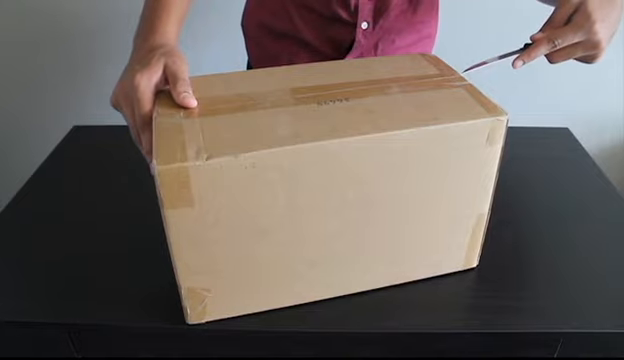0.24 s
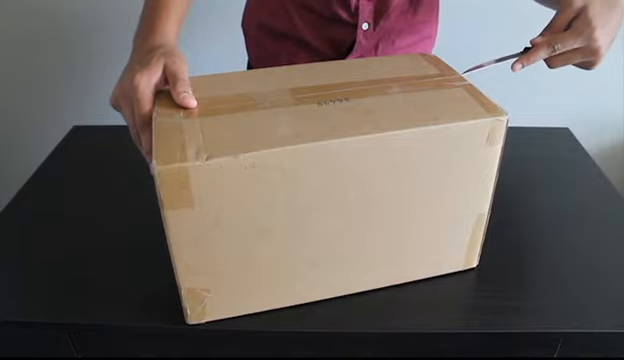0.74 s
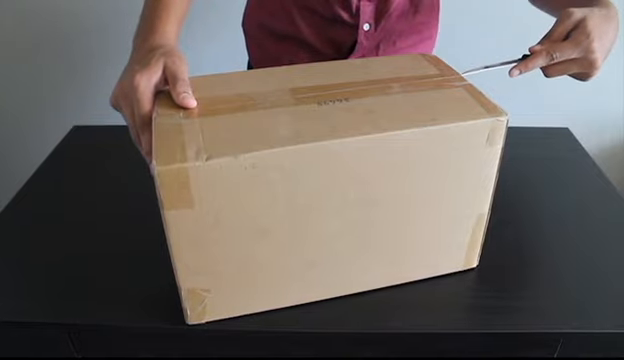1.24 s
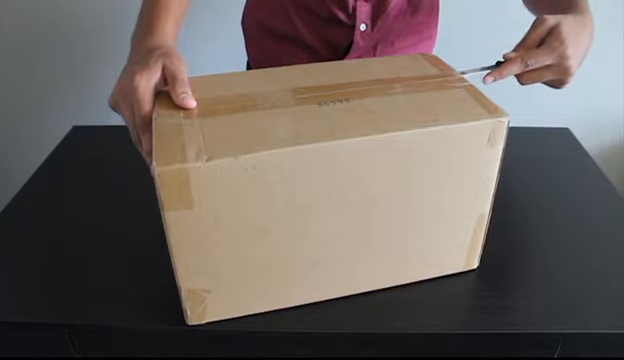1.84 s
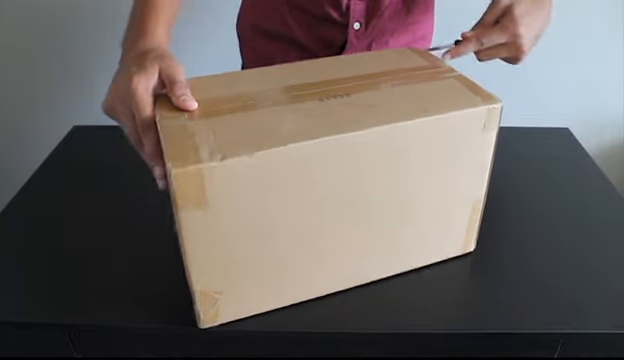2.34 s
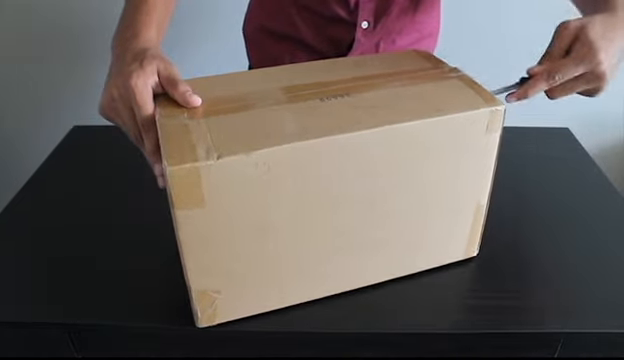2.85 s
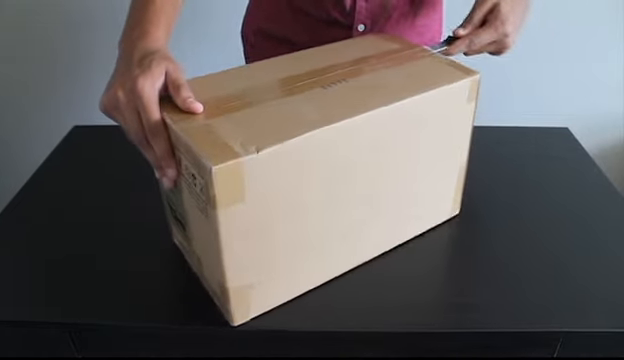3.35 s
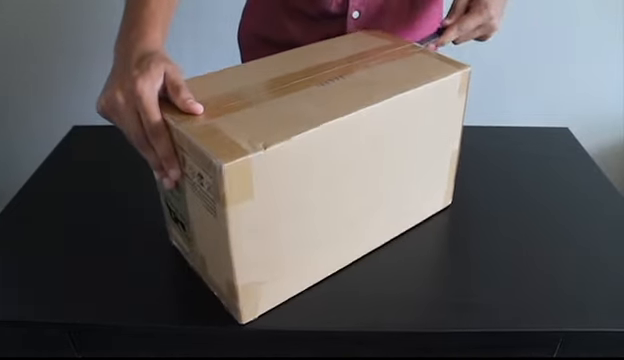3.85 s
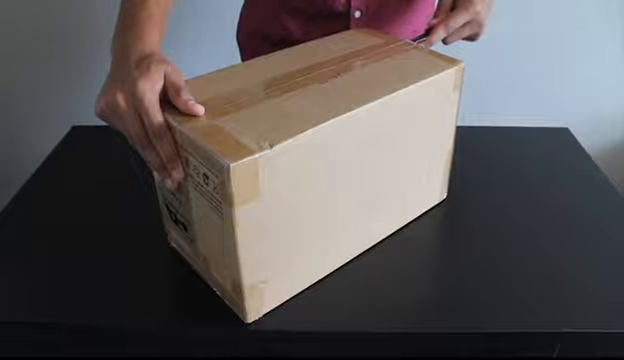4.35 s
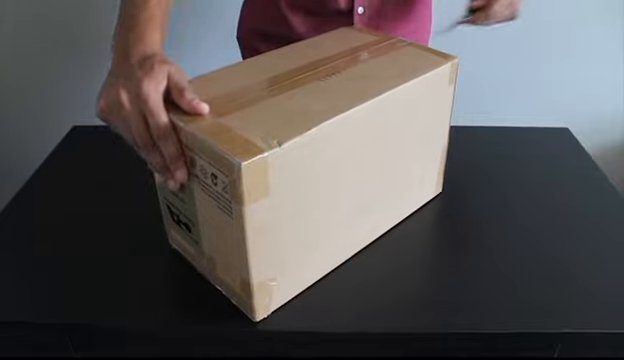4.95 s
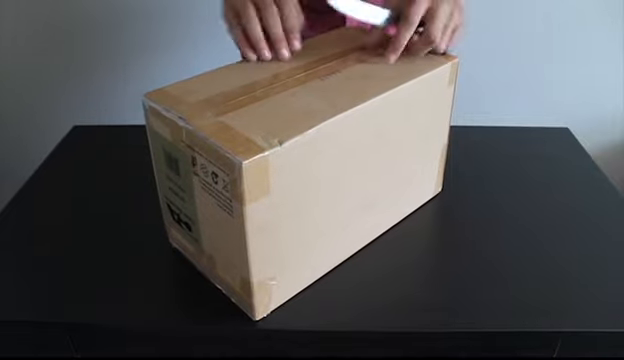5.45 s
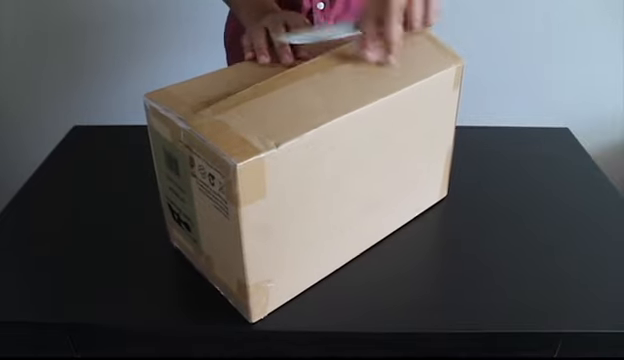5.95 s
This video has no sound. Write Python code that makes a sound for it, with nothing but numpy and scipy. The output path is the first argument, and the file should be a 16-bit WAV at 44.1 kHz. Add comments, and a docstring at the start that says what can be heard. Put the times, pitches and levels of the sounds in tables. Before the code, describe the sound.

Brief papery scrapes and crisp tape snaps on a cardboard box, followed by loud double knife knocks and soft thumps, close up indoors.

```python
"""A low room hum, faint hiss and a thin wandering whine open the scene; then a knife saws through packing
tape on a cardboard box that stands on a table in a quiet, bare room.
Slips of the blade and knocks ring the box walls, torn fibres crackle in the tape, the table thumps.
Clicks excite decaying modes, sparse echoes make the room, coloured noise makes hum and hiss."""
import sys
import numpy as np
from scipy import signal
from scipy.fft import rfft, irfft
from scipy.io import wavfile
from scipy.ndimage import uniform_filter1d

SR = 44100
rng = np.random.default_rng(int(sys.argv[2]) if len(sys.argv) > 2 else 0)


def file_out(sig):
    """Save sig as 16-bit WAV at sys.argv[1]."""
    # one column per channel
    cols = np.atleast_2d(sig).T
    # limit, then scale
    lim = np.clip(cols, -1, 1)
    pcm = np.round(lim * 32767).astype(np.int16)
    wavfile.write(sys.argv[1], SR, pcm)


def volts_from_decibels(level):
    """Turn decibel levels (scalar or array-like) into linear amplitude factors."""
    exponent = np.asarray(level, float) / 20
    return 10 ** exponent


N = 273420  # length in samples

# Strokes of blade or hand, rubbing levels at the height of the stroke:
# start_s, length_s, low_walls_db, upper_walls_db, flap_db, tape_db
STROKES = [(0.576, 0.18, -44, -44, -46, -43), (0.845, 0.22, -51, -57, -63, -67),
           (0.983, 0.25, -54.5, -51, -53.5, -54.5), (1.468, 0.13, -38, -41, -49, -46.5),
           (1.585, 0.087, -34.5, -35, -41, -41.5), (1.648, 0.075, -41, -46, -47, -36),
           (1.667, 0.13, -46, -46, -47.5, -53), (1.904, 0.16, -41.5, -42.5, -46, -44.5),
           (2.595, 0.23, -52.5, -56, -51.5, -63), (3.204, 0.21, -44.5, -50.5, -51, -63),
           (3.425, 0.16, -46, -50.5, -46, -51), (3.804, 0.15, -50, -42.5, -52, -56),
           (4.779, 0.19, -54, -53, -55, -62), (5.62, 0.21, -60, -53, -65, -75),
           (6.099, 0.13, -55, -52.5, -51, -64)]
# The blade catches and tape fibres snap; the rows near 2.0 s and 6.0 s are dull thuds that set the flap going.
# Peak levels: # start_s, tape_crack_db, low_walls_db, upper_walls_db, flap_db
SNAPS = [(0.2742, -26.5, -63, -58, -60), (0.5674, -14, -26, -25.5, -26.5), (0.5687, -19, -40, -30, -35),
         (0.5906, -19, -38, -36, -28), (0.6305, -39, -49, -42, -39), (0.672, -25.5, -56, -32, -41),
         (1.595, -43, -35, -31, -42), (1.6099, -37, -29.5, -31, -35), (1.9992, -32, -17.5, -18, -28.5),
         (2.0405, -26, -50, -52, -50), (2.0601, -50, -42, -34, -54), (3.4034, -51, -45, -43, -41),
         (3.921, -30, -64, -60, -54), (4.0739, -28.5, -60, -60, -38), (4.8135, -50, -50, -37, -37),
         (4.8213, -33.5, -53, -42, -42), (5.219, -31, -55, -52, -42), (5.7595, -37, -57, -61, -59),
         (5.8928, -34, -45, -37.5, -34.5), (6.0016, -29, -18.5, -21.5, -25.5),
         (6.1056, -50, -43, -31.5, -28)]
# The knife strikes the box, peak levels:
# start_s, blade_clack_db, table_thump_db, low_walls_db, upper_walls_db, handle_db
KNOCKS = [(4.873, -44, -46, -51, -51, -42), (4.888, -44, -46, -52, -48, -44),
          (4.8976, -36, -42, -56, -38, -37), (4.9227, -30.5, -31, -34.5, -25, -23),
          (4.944, -46, -41, -48, -47, -38), (4.9854, -43, -46, -40, -41, -40),
          (5.242, -11.5, -18.5, -27, -7, -8), (5.2650, -3, -15, -11.5, -10.5, -3),
          (5.326, -16, -41, -47, -22.5, -16), (5.3896, -30, -36, -41, -36, -35)]
# Soft pushes on the box, peak levels: start_s, table_thump_db, low_walls_db, upper_walls_db
THUDS = [(0.63, -38, -49, -48), (0.668, -34, -47, -45), (1.594, -37, -45, -53), (4.478, -43.5, -50, -48),
         (4.779, -40, -38.5, -49), (5.307, -26.5, -25, -20.5), (5.4775, -21.5, -42, -42),
         (5.491, -32, -28, -35), (5.54, -38, -36, -55), (5.6083, -42, -37, -34.5), (6.062, -49, -34, -34)]

# Modes of each body, levels relative within the body: pitch_hz, level_db, t60_s
TAPE = [(2635, 2.5, 0.0042), (3420, 2, 0.0039), (4630, 6, 0.0018), (6430, 7, 0.0012), (8830, 6, 0.0015),
        (10630, 5.5, 0.0017), (13000, 5.5, 0.00099), (15100, -1, 0.001)]
FLAP = [(1060, 2, 0.016), (1454, -1, 0.017), (1803, 3, 0.0084), (2270, -2, 0.0095)]
UPPER_WALLS = [(438.5, -1, 0.047), (508, 3.5, 0.039), (608, 8, 0.025), (752, -4.5, 0.038),
               (925, -2.5, 0.028)]
LOW_WALLS = [(252.4, -2, 0.039), (262.2, 14, 0.031), (415, -7, 0.041)]
TABLE = [(43.3, 9, 0.12), (64.4, -8, 0.077), (99.4, 1, 0.082), (167.5, 3.5, 0.05)]
KNIFE = [(2530, 0.5, 0.0057), (3370, -2.5, 0.0029), (4290, -1, 0.0063), (5500, -6.5, 0.0046),
         (6470, -6, 0.0068), (8200, -0.5, 0.0025), (10700, -5.5, 0.0024), (13100, -1.5, 0.0013),
         (15900, -26, 0.0018)]
HANDLE = [(1180, -3, 0.017), (1572, 7.5, 0.019), (1781, -7, 0.048), (1950, -3, 0.017)]

# Shudder of the loose box, level under the blow, one row:
# low_walls_db, upper_walls_db, flap_db, tape_db
SHUDDER_DB = (-19, -22, -25, -30)
# Decay of the room by band: frequency_hz, t60_s
ROOM = [(150, 0.13), (500, 0.26), (1500, 0.17), (4000, 0.1), (12000, 0.24)]
# Colour of the room hum: frequency_hz, relative_level_db
HUM = [(2, -4), (4, 10), (16, 1.5), (32, -11), (125, -12.5), (162, -10), (205, -15.5), (382, -19),
       (465, -14.5), (560, -20.5), (800, -20.5), (1340, -22), (3070, -26.5), (15500, -27.5)]
# Colour of the hiss opposed between the channels: frequency_hz, relative_level_db (per Hz)
HISS = [(2, 6), (16, -2), (320, -14.5), (760, -16.5), (2200, -18), (13400, -18), (16500, -20.5)]
# Path of the whine before its tremble: time_s, pitch_hz
WHINE = [(0.0, 1200), (0.24, 1000), (0.4, 1265), (0.62, 1190), (0.899, 1276), (1.219, 1040), (1.43, 1196),
         (1.58, 1080), (1.8, 1230), (2.25, 1340), (2.6, 1190), (3.05, 1200), (3.5, 1300), (4.001, 1252),
         (4.3, 1106), (4.87, 1304), (5.1, 1180), (5.4, 1290), (5.7, 1190), (6.08, 1320), (6.2, 1230)]

SLIPS_PER_S, TEARS_PER_S = 2000, 1800
PEAK_AT = 0.37  # where in a stroke the pressure peaks (0-1)
STROKE_ENDS_DB, STROKE_ROUNDNESS = -22, 1.6  # level at both ends under the peak, shape of the arch
SHUDDER_AFTER_S, SHUDDER_FADE_DB_PER_S = 0.01, 142
SNAP_THUMP_DB = -14  # the table follows the low walls
ROOM_DB = -10.5
HUM_DB, HISS_DB, NOISE_EDGE_HZ = -46.5, -57, 15820
WHINE_LEFT_DB, WHINE_RIGHT_UNDER_LEFT_DB = -60.5, -28
WHINE_TREMBLE_HZ = 34.54  # rms


def evened(x):
    """Scales a signal to an rms of 1."""
    return x / np.sqrt(np.mean(x ** 2) + 1e-20)


def add(mix, start_s, sound):
    """Mixes a sound in at a time, cut where the mix ends."""
    part = mix[max(round(start_s * SR), 0):][:len(sound)]
    part += sound[:len(part)]


def clicks(per_s, spread_db, size):
    """Random clicks of either sign, a few of them large, at an rms of 1."""
    chance, side = rng.random((2, size))
    height = volts_from_decibels(spread_db * np.minimum(rng.exponential(1, size), 4))
    return evened((chance < per_s / SR) * height * np.sign(side - 0.5))


def ring(modes, detune=1):
    """Answer of a body to one click, energy 1: decaying modes that swell over their first cycle."""
    t = np.arange(SR // 4) / SR
    hz, db, t60 = np.transpose(modes)[..., None]
    sense = (-1) ** np.arange(len(modes))[:, None]  # neighbours move in opposite senses
    swell = 1 - np.exp(-(2.13 * hz * t) ** 2)
    decay = volts_from_decibels(db - 60 * t / t60)
    rings = (sense * swell * decay * np.sin(2 * np.pi * hz * detune * t)).sum(0)
    return rings / np.linalg.norm(rings)


def pressure():
    """Rubbing level of low walls, upper walls, flap and tape: an arch per stroke, a shudder per snap or knock."""
    t = np.arange(N) / SR
    power = np.zeros((4, N))
    for start, length, *part_db in STROKES:
        inside = (t >= start) & (t < start + length)
        u = (t[inside] - start) / length
        off_peak = np.where(u < PEAK_AT, 1 - u / PEAK_AT, (u - PEAK_AT) / (1 - PEAK_AT))
        arch_db = STROKE_ENDS_DB * off_peak ** STROKE_ROUNDNESS
        power[:, inside] += volts_from_decibels(np.add.outer(part_db, arch_db)) ** 2

    # the loose box shudders on; after a knock, handle and blade levels set flap and tape
    shaken = [(s, low, up, flap, tape) for s, tape, low, up, flap in SNAPS]
    shaken += [(s, low, up, handle, blade) for s, blade, _, low, up, handle in KNOCKS]
    fade_db = -SHUDDER_FADE_DB_PER_S * np.arange(SR // 2) / SR
    for s, *part_db in shaken:
        shudder = volts_from_decibels(np.add.outer(np.add(part_db, SHUDDER_DB), fade_db))
        add(power.T, s + SHUDDER_AFTER_S, shudder.T ** 2)
    return np.sqrt(power)


def strokes():
    """Stick-slip of the blade shakes walls and flap; tape fibres tear in dense fine clicks."""
    # pressure comes in lumps, 2.04 dB rms
    judder = volts_from_decibels(2.04 * evened(uniform_filter1d(rng.standard_normal(N), 300)))
    slips = judder * clicks(SLIPS_PER_S, 1.3, N)
    tears = judder * clicks(TEARS_PER_S, 1.84, N)
    dull_tears = signal.lfilter([1], [1, -0.45], tears)  # a slow tear is darker than a snap
    drives = (slips, slips, 0.77 * slips + 0.65 * tears, dull_tears)
    bodies = (LOW_WALLS, UPPER_WALLS, FLAP, TAPE)
    out = np.zeros(N)
    for level, drive, modes in zip(pressure(), drives, bodies):
        out += signal.oaconvolve(level * evened(drive), ring(modes))[:N]
    return out


def blows(events, bodies, contact_s, chatter_db):
    """Each blow is a first click and a short chatter that ring the bodies it reaches."""
    out = np.zeros(N)
    size = SR // 50
    t = np.arange(size) / SR
    for s, *part_db in events:
        chatter = volts_from_decibels(chatter_db) * clicks(6000, 3.0, size) * np.exp(-(t / contact_s) ** 2)
        spot = 1 + 0.015 * rng.standard_normal((9, 1))  # each spot struck shifts the modes a little
        for db, modes in zip(part_db, bodies):
            felt = min(modes[0][0] / 2400, 1)  # heavy, low parts hardly feel the chatter
            strike = felt * chatter + (t == 0)
            sound = signal.fftconvolve(strike, ring(modes, spot[:len(modes)]))
            add(out, s, volts_from_decibels(db) * sound / abs(sound).max())
    return out


def snaps():
    """The blade catches and fibres snap, or a dull thud shakes the flap: the tape cracks, and walls, flap and
    table answer."""
    events = [(s, tape, low + SNAP_THUMP_DB, low, up, flap) for s, tape, low, up, flap in SNAPS]
    return blows(events, (TAPE, TABLE, LOW_WALLS, UPPER_WALLS, FLAP), contact_s=0.0026, chatter_db=-24)


def knocks():
    """The knife strikes the box: blade and handle ring along with table and walls."""
    bodies = (KNIFE, TABLE, LOW_WALLS, UPPER_WALLS, HANDLE)
    return blows(KNOCKS, bodies, contact_s=0.0027, chatter_db=-11.5)


def thuds():
    """Soft pushes on the box ring table and walls with little chatter."""
    return blows(THUDS, (TABLE, LOW_WALLS, UPPER_WALLS), contact_s=0.0029, chatter_db=-30)


def read(points, hz):
    """Reads a curve on a log-frequency axis."""
    f, value = np.transpose(points)
    return np.interp(np.log(hz + 1), np.log(f + 1), value)


def room(x):
    """Sparse echoes of random sign, each band dying at its own speed."""
    taps = np.zeros(SR // 2)
    at = np.arange(200, len(taps) - 20, 20)  # one echo in every 20 samples
    taps[at + rng.integers(0, 20, len(at))] = rng.choice([-1.0, 1.0], len(at))
    hz, t, z = signal.stft(taps, SR, nperseg=256)
    decay = volts_from_decibels(-60 * t / read(ROOM, hz)[:, None])
    low_cut = np.clip(hz / 120, 0, 1)[:, None]
    tail = signal.istft(z * decay * low_cut, SR, nperseg=256)[1]
    return signal.oaconvolve(x, tail / np.linalg.norm(tail))[:N]


def noise(spectrum, db):
    """Steady noise of a given colour and rms level, empty above the edge."""
    hz = np.fft.rfftfreq(N, 1 / SR)
    colour = volts_from_decibels(read(spectrum, hz)) * (hz < NOISE_EDGE_HZ)
    return volts_from_decibels(db) * evened(irfft(rfft(rng.standard_normal(N)) * colour, N))


def whine():
    """A thin tone whose pitch wanders and trembles, stronger on the left."""
    s, hz = np.transpose(WHINE)
    wander = np.interp(np.arange(N) / SR, s, hz)
    slow_noise = uniform_filter1d(uniform_filter1d(rng.standard_normal(N), 400), 400)
    turns = np.cumsum(wander + WHINE_TREMBLE_HZ * evened(slow_noise)) / SR
    left = np.cos(2 * np.pi * turns)
    right = volts_from_decibels(WHINE_RIGHT_UNDER_LEFT_DB) * np.cos(2 * np.pi * turns + 0.7)
    return volts_from_decibels(WHINE_LEFT_DB) * np.sqrt(2) * np.array([left, right])  # sqrt(2): levels are rms


def scene():
    """Box, room and hum reach both channels alike; hiss is opposed and the whine leans left."""
    box = strokes() + snaps() + knocks() + thuds()
    both = box + volts_from_decibels(ROOM_DB) * room(box) + noise(HUM, HUM_DB)
    hiss = noise(HISS, HISS_DB)
    return np.array([both + hiss, both - hiss]) + whine()


def low_pass(x):
    """Removes everything above the highest recorded frequency."""
    return signal.sosfilt(signal.butter(12, 16460, fs=SR, output="sos"), x)


def record(dry):
    """Clips the finished mix at full scale."""
    mix = np.clip(dry, -1, 1)
    return low_pass(mix)


dry = scene()
out = record(dry)
file_out(out)
```